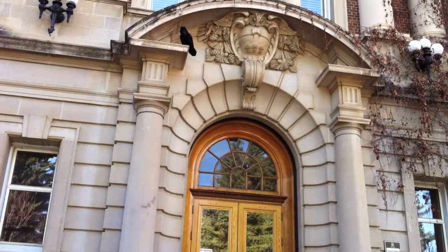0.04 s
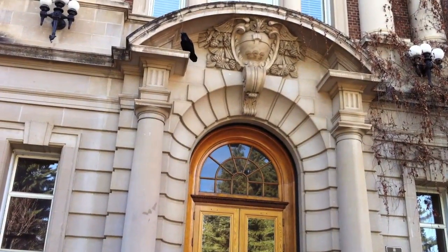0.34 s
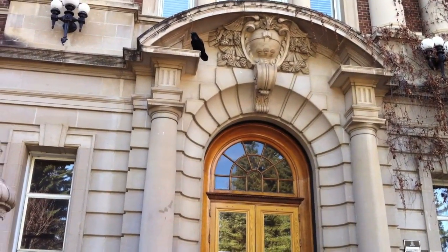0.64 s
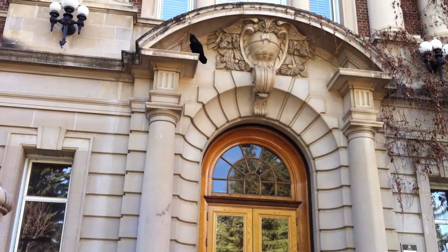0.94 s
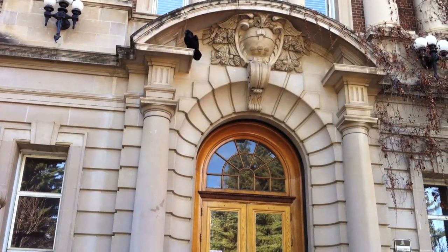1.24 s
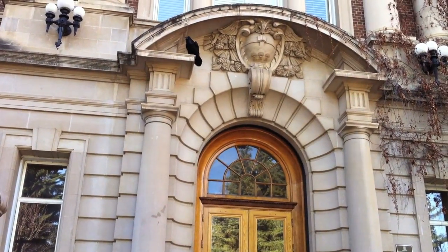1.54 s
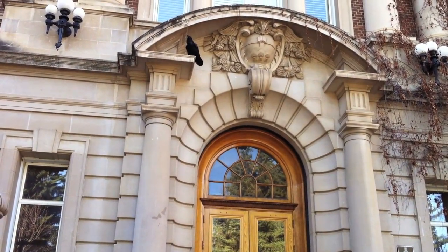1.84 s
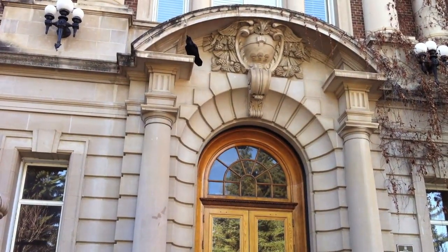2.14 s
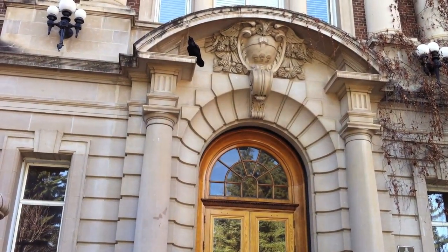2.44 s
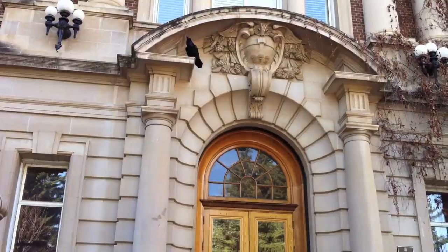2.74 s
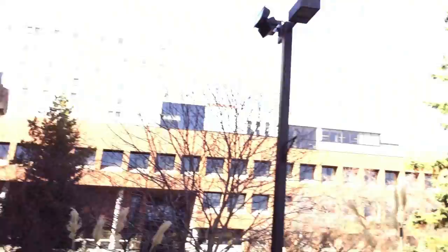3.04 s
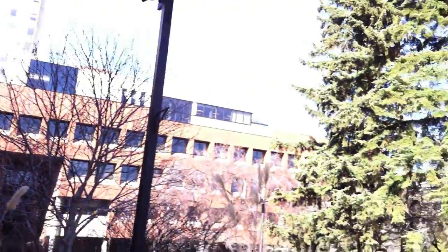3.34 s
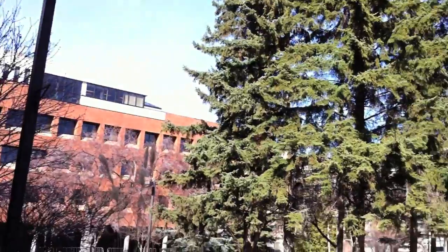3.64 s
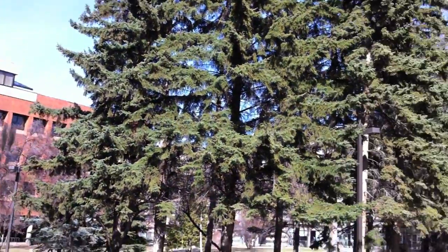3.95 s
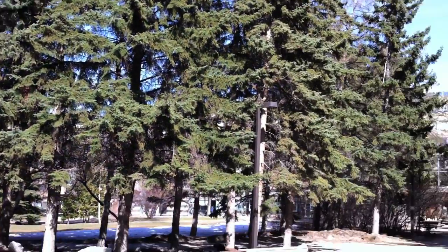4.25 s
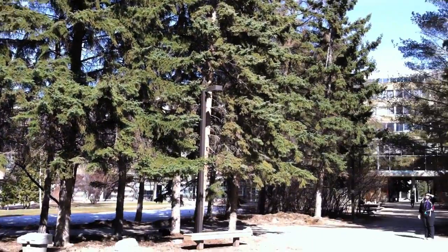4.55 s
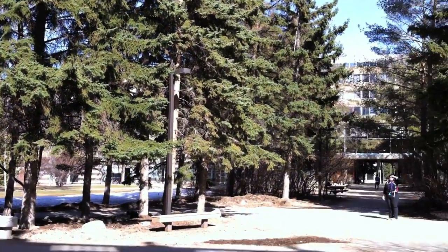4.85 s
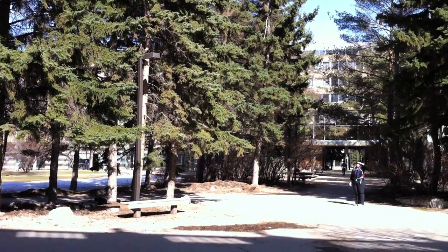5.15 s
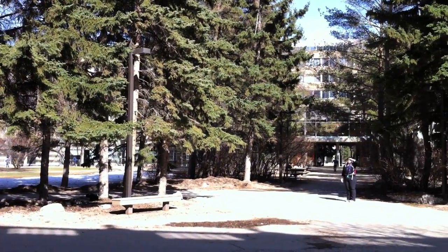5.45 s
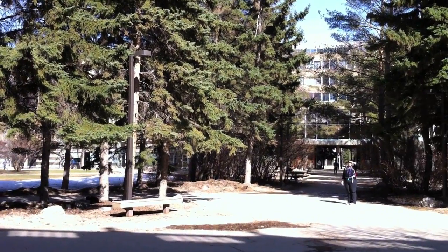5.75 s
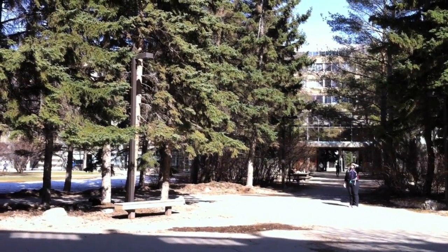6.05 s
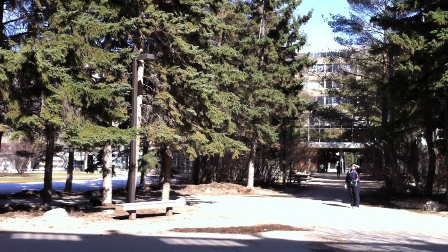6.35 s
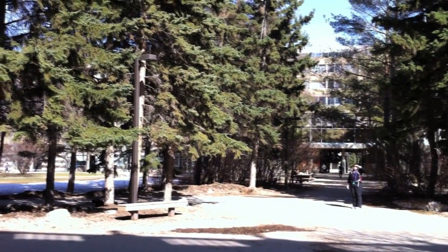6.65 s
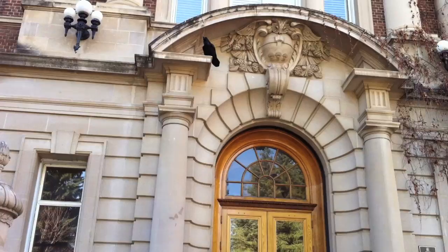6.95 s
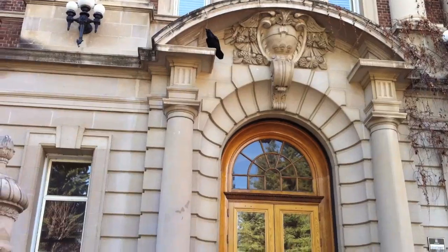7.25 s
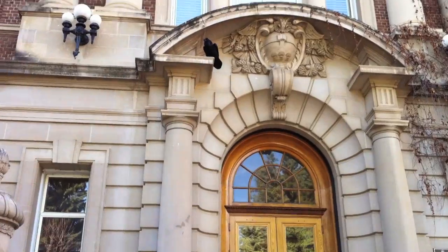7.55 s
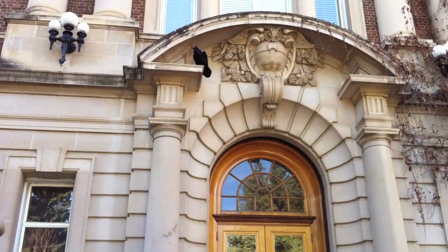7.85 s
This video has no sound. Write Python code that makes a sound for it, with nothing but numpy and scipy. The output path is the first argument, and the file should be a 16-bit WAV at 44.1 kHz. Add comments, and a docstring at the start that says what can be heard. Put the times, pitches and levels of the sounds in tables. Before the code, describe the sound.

A raven calls in an outdoor courtyard, loud against a soft, steady rumble of distant traffic, a faint ventilation hum and an airy hiss. At about 1.1 seconds, three quick hollow clicks swell into a gulp, followed by a low, throbbing coo with a slight breathy hiss and a closing gulp, about half a second in all. The same call comes again at about 3 and 5.9 seconds, each with a light echo off the walls. At 7.8 seconds the raven gives only the opening clicks and gulp. Throughout, small birds add faint buzzy chirps, falling notes and a few two-note whistles. A hand and sleeve brush the microphone with dry ticks and light rubs, mostly in the first second and again from 7 seconds, and there is one short dull bump at about 6.9 seconds.

```python
"""A raven in a courtyard

A raven on a ledge under a stone arch calls four times. Each call opens with clicks that ring its throat
and bill and swell into a gulp. The first three go on to a low throbbing coo, a hiss of air and a closing
gulp. Small birds chirp over the far rumble of town, and a hand and sleeve brush the microphone."""
import sys
import numpy as np
from scipy import signal
from scipy.fft import rfft, irfft, next_fast_len
from scipy.io import wavfile

SR = 44100
rng = np.random.default_rng(int(sys.argv[2]) if len(sys.argv) > 2 else 0)


def wrap_up_sound(samples):
    """Save the sound to the file named by the first command line argument, as 16-bit audio."""
    columns = np.atleast_2d(samples).T
    # keep every value between -1 and 1, then stretch to whole-number steps
    tamed = np.clip(columns, -1, 1)
    steps = np.round(tamed * 32767).astype(np.int16)
    wavfile.write(sys.argv[1], SR, steps)


N = 347949
T = np.arange(N) / SR

# How strong far traffic is from low to high: frequency_hz, relative_db
TRAFFIC_SPECTRUM = [(15, -82.5), (25, -37.5), (48, -39), (56, -17.5), (65, -20), (199, -0.5), (248, -4.5),
                    (388, -11), (444, -10.5), (565, -10), (605, -11), (648, -9.5), (796, -16.5),
                    (1010, -16), (1500, -24.5), (1950, -48), (3300, -120)]
# The same for the hiss of open air: frequency_hz, relative_db
AIR_SPECTRUM = [(880, -18.5), (1500, -2.5), (2450, -6.5), (2760, -4.5), (3270, -5), (4220, -6), (5730, -10),
                (6320, -13), (14200, -17), (15800, -18)]
# Tones of the ventilation hum: pitch_hz, level_db
HUM_TONES = [(81, -67), (120, -65.5), (241, -59)]
# Buzzy chirps: start_s, length_s, middle_hz, end_to_middle_ratio, relative_db, rasp (0 to 1)
CHIRPS = [(0, .053, 3900, 0.95, -44.5, 1), (.375, 0.081, 4200, 0.924, -42.5, .65),
          (0.431, 0.0634, 5100, 0.92, -47.5, .6), (1.711, 0.119, 4130, 0.937, -48.5, 0.4),
          (1.855, 0.081, 5080, 1.06, -41, 0.52), (2.181, 0.1425, 3920, 0.86, -48, 0.57),
          (2.333, 0.0836, 5400, 0.935, -49, 0.55), (2.819, 0.073, 4000, 0.88, -46, 0.98),
          (2.861, 0.039, 5000, 1, -46.5, .1), (2.911, 0.031, 3600, 1.07, -47, 0.2),
          (2.96, 0.05793, 4290, 0.95, -44, 0.65), (3.499, 0.0843, 3841, 0.95, -45, 0.79),
          (3.804, 0.09466, 4800, 0.885, -46.5, 0.77), (3.906, 0.0575, 5930, 1.04, -45.5, 0.43),
          (4.35, .095, 3950, 0.893, -45, 0.48), (4.727, 0.0555, 5150, 0.94, -45.5, 0.63),
          (5.189, .09, 4090, 0.86, -43, 0.55), (5.212, 0.08, 5155, .86, -49.5, .6),
          (5.288, 0.066, 3780, 0.92, -45, 0.84), (5.381, 0.061, 4780, 1.21, -46.5, 0.6),
          (5.463, .064, 7230, 1.06, -51.5, 0.28), (5.723, 0.082, 5100, 1.07, -45, 1),
          (5.929, 0.053, 4000, 0.81, -44.5, 0.52), (6.552, 0.058, 4320, 0.916, -43, 0.94),
          (6.602, 0.066, 5420, .96, -46.5, 0.2), (6.627, .096, 3850, 0.87, -43, 0.73),
          (6.772, 0.03507, 4307, 0.88, -42.5, 0.9), (7.22, 0.10696, 3683, 0.82, -49, 0.26),
          (7.293, 0.074, 2310, 0.928, -44.5, .06), (7.681, 0.047, 4000, 0.77, -46, 0.54)]
# Notes of a falling bird call: delay_s, length_s, first_hz, middle_hz, last_hz, relative_db, rasp
FALLING_NOTES = [(0, .094, 4400, 3050, 2085, -1.5, .7), (.026, 0.0444, 3545, 3250, 3020, -4, 1)]
# Notes of a two-note whistle, with the same columns
WHISTLE_NOTES = [(0, .05, 3741, 3987, 4378, 0.25, .05), (.04, .09, 2560, 2965, 2520, -1.5, .02)]
# When the falling calls come: start_s, relative_db
FALLING_CALLS = [(.137, -40), (.398, -43.5), (1.893, -40.5), (3.08, -39), (3.957, -41.5), (5.446, -41),
                 (6.558, -39), (6.763, -41)]
# When the two-note whistles come: start_s, relative_db
WHISTLE_CALLS = [(0.917, -48), (2.576, -45.5), (4.688, -48.5), (4.88, -64), (7.55, -47)]
# Rubs of hand and sleeve: start_s, end_s, base_level_db, grain_db
RUBS = [(0.082, 0.288, -56, 1.5), (0.671, 0.779, -48.5, 2), (1.678, 1.963, -81.5, 10),
        (2.167, 2.274, -60.5, 2.5), (2.691, 2.779, -62, 5.5), (2.833, 2.998, -61, 3.5),
        (4.137, 4.242, -72.5, 7.5), (4.667, 4.772, -64.5, 5.5), (7.112, 7.455, -49.5, 0.5),
        (7.472, 7.735, -57, 2.5), (7.687, 7.971, -50.5, 1.5)]
# How strong the rubbing is from low to high: frequency_hz, relative_db
RUB_SPECTRUM = [(820, -13), (1400, 0), (1600, -6), (2250, 0.5), (2960, -3), (3380, -0.5), (7390, -5),
                (11500, -4.5), (15800, -8)]
# Ticks of fingers and clothing: start_s, peak_db, centre_hz
TICKS = [(.099, -26.5, 11000), (.214, -37, 7484), (.297, -36.5, 4970), (0.676, -36, 11250),
         (0.696, -39.5, 10100), (2.211, -42, 11200), (2.747, -42, 1300), (3.721, -44, 10150),
         (4.14, -41, 10660), (4.755, -45, 7960), (5.199, -39, 4458)]
# Rattles that open the calls: start_s, click_gap_s, first_ring_db, first_snap_db, brightness_hz
RATTLES = [(1.0939, 0.0162, -15.5, -28.5, 3050), (3.022, 0.014, -18, -32.5, 3600),
           (5.8816, .016, -15, -28.5, 5360), (7.7745, 0.014909, -16, -27, 4780)]
# High tones at which throat and bill ring: pitch_hz, relative_db, ring_s (time to fade by 60 dB)
BILL_TONES = [(1360, -27, 0.033), (1690, -22.5, 0.053), (2526.4, -10, 0.02334), (2709.4, -7.5, 0.0167),
              (3154, -4, 0.00562), (3540, -11.5, 0.011), (4220, -7.5, 0.005), (5075, -14.5, 0.0121),
              (6060, -8.5, 0.00337)]
# Gulps: start_s, hold_s, pitch_hz, glide_hz_per_s, level_db, low_tone_relative_db, fade_db_per_s,
# pulsing (0 to 1)
GULPS = [(1.136, 0.029, 1089, 699.5, -13, -11, 560, 0.6), (1.522, 0.054, 1034, 900, -18, -8, 1701, 0.86),
         (3.056, 0.039, 1122, 500, -11.5, -17.5, 799, 0.66),
         (3.477, 0.048, 1039, 505, -16, -10.5, 1905.5, 1), (5.922, 0.0217, 1108, -600, -14, -14, 400, 0.4),
         (6.329, 0.051, 1034, 1002.5, -18, -11.5, 1000, 0.84),
         (7.815, .018, 1120, 1700, -14.5, -10.5, 380, 0.8)]
# How strong the raven's hiss is from low to high: frequency_hz, relative_db
HISS_SPECTRUM = [(880, -36.5), (1500, -38.5), (1640, -9.5), (1790, -17.5), (2340, -17), (2710, -4),
                 (3050, -6.5), (4660, -1), (5450, -10.5), (7770, -13.5), (8410, -14.5), (8750, -16.5),
                 (12200, -15.5), (13400, -18), (15800, -18)]
# Bands where air whistles in the bill: centre_hz, half_width_hz, relative_db
HISS_WHISTLES = [(2485, 200, -2), (4140, 91, 6.5), (4360, 74, -15), (4830, 19, -1), (4724, 60, 6),
                 (7940, 73, -17), (8920, 130, -5.5), (11370, 270, -7.5), (13007, 77, -1.5)]
# Coos: start_s, length_s, lowest_hz, level_db, swell_db, extra_start_roughness (0 to 1)
COOS = [(1.204, 0.312, 554.2, -19.5, 7.5, 0.68), (3.137, .33, 548.4, -21.5, 7, 0.7),
        (5.99, 0.32831, 542, -21.5, 3.5, 0.24)]
# Distant low swells: start_s, end_s, first_hz, last_hz, level_db
DRONES = [(2.035, 2.247, 371.3, 345.9, -45.5), (2.201, 2.454, 326.4, 295.9, -49.5),
          (3.521, 3.568, 150, 141, -41.5), (3.778, 3.935, 256.2, 257, -46),
          (7.185, 7.321, 259.4, 258, -43.5)]
# Echoes off the courtyard walls: delay_s, relative_db
WALL_ECHOES = [(.043, -15.5), (.068, -22.5), (.2, -56), (.45, -34.5)]


def from_db(db):
    """Turn decibels into a number to multiply a sound by."""
    return 10 ** (np.asarray(db) / 20)


def unit_level(x):
    """Scale a signal so that its average strength (rms) is 1."""
    return x / np.sqrt(np.mean(x ** 2) + 1e-20)


def add(track, start_s, sound):
    """Mix a sound into a track at the given time."""
    at = max(0, round(start_s * SR))
    track[at:at + len(sound)] += sound[:max(0, N - at)]


def seconds(length):
    """The time of each sample in a short sound."""
    return np.arange(max(8, int(length * SR))) / SR


def span(start_s, count):
    """The places in the track that a short sound covers."""
    return np.clip(int(start_s * SR) + np.arange(count), 0, N - 1)


def phase_of(hz):
    """The running angle of a wave whose pitch may change."""
    return 2 * np.pi * np.cumsum(hz) / SR


def keep_band(x, hz, kind, order=2):
    """Keep the lows, the highs or a band between."""
    return signal.sosfilt(signal.butter(order, hz, kind, fs=SR, output="sos"), x)


def flutter(hz):
    """Random wavering up to about this rate, with a typical size of 1."""
    return unit_level(keep_band(rng.standard_normal(N), hz, "low"))


def noise(spectrum):
    """Noise of strength 1, shaped by a spectrum table."""
    hz, db = np.transpose(spectrum)
    size = next_fast_len(N)
    log_hz = np.log(np.maximum(np.arange(size // 2 + 1) * SR / size, 1))
    gain = from_db(np.interp(log_hz, np.log(hz), db, left=-120, right=-120))
    return unit_level(irfft(rfft(rng.standard_normal(size)) * gain, size)[:N])


def swell(start, end, power):
    """A rise from 0 to 1 and back; a small power flattens the top."""
    return np.sin(np.pi * np.linspace(0, 1, len(seconds(end - start)))).clip(0) ** power


def ring(t, hz, ring_s):
    """A tone that fades by 60 dB in ring_s."""
    return np.sin(2 * np.pi * hz * t) * from_db(-60 * t / ring_s)


def echo(x, delay_s, db):
    """A sound together with one reflection of it."""
    return x + from_db(db) * np.interp(T - delay_s, T, x, left=0)


def town(traffic_db=-46, waver_db=1.1053, air_db=-56):
    """Far traffic rumbles, ventilation hums and the open air hisses evenly."""
    traffic = from_db(traffic_db + waver_db * flutter(4)) * noise(TRAFFIC_SPECTRUM)
    hum = sum(np.sqrt(2) * from_db(db) * np.sin(phase_of(hz + 2 * flutter(8))) for hz, db in HUM_TONES)
    return traffic + hum + from_db(air_db) * noise(AIR_SPECTRUM)


def bird_notes(start_ratio=0.93):
    """List every small bird's note; a chirp starts a little low, which bends its glide."""
    notes = [(start, length, start_ratio * hz / glide, hz, glide * hz, db, rasp)
             for start, length, hz, glide, db, rasp in CHIRPS]
    for phrase, calls in ((FALLING_NOTES, FALLING_CALLS), (WHISTLE_NOTES, WHISTLE_CALLS)):
        for start, db in calls:
            for delay, length, first, middle, last, note_db, rasp in phrase:
                notes.append((start + delay, length, first, middle, last, db + note_db, rasp))
    return notes


def small_birds(clear_hz=2500, harsh_hz=4200, throat_hz=3200, throat_db=4, fade_db=7):
    """Whistles glide through three pitches, grow where the throat rings and buzz more when high."""
    out, jitter = np.zeros(N), flutter(800)
    flicker = from_db(2.5 * flutter(96))
    wander = 1 + 0.01203 * flutter(38.5)
    for start, length, first, middle, last, db, rasp in bird_notes():
        shape = swell(start, start + length, power=0.31)
        here, progress = span(start, len(shape)), np.linspace(0, 1, len(shape))
        hz = np.polyval(np.polyfit([0, .5, 1], [first, middle, last], 2), progress) * wander[here]
        boost_db = throat_db * np.exp(-((hz - throat_hz) / 350) ** 2)
        level = from_db(db + boost_db - fade_db * progress ** 3)
        buzz = 0.1234 * rasp * np.interp(hz, [clear_hz, harsh_hz], [.1, 1]) * jitter[here]
        main = np.sin(phase_of(hz * (1 + buzz)))
        # The other side of the bird's voice box adds a higher tone.
        second = from_db(-7) * rasp * (1 - progress) * np.sin(phase_of(hz * 1.4 * (1 - buzz)))
        add(out, start, level * shape * flicker[here] * (main + second))
    return echo(out, delay_s=.012, db=-12)   # off the nearest house front


def handling(tick_ring_s=0.024, bump_at_s=6.888, bump_db=-20, bump_hz=190, bump_ring_s=0.0068):
    """A hand and sleeve make grainy rubs, dry ticks and one dull bump on the casing."""
    out, cloth, grain = np.zeros(N), noise(RUB_SPECTRUM), flutter(189.9)
    for start, end, db, grain_db in RUBS:
        shape = swell(start, end, power=0.535)
        here = span(start, len(shape))
        add(out, start, from_db(db + grain_db * (grain[here] + 1)) * shape * cloth[here])
    for start, db, hz in TICKS:
        burst = keep_band(rng.standard_normal(2048), [hz / 1.2592, hz * 1.33], "band")
        tick = burst * from_db(-60 * T[:len(burst)] / tick_ring_s)
        add(out, start, from_db(db) * tick / np.abs(tick).max())
    t = seconds(.04)
    knock = np.cos(2 * np.pi * bump_hz * t) * from_db(-60 * t / bump_ring_s)
    dull_knock = keep_band(knock, 2730, "low", order=4)
    add(out, bump_at_s, from_db(bump_db) * keep_band(dull_knock, 136.6, "high"))
    return out


def raven_rattle(throat_hz=1075, low_hz=530, ring_s=0.031, ring_step_db=6, snap_step_db=3):
    """Three ever louder clicks: each is a brief scrape that rings the throat and bill."""
    out, t = np.zeros(N), seconds(0.069)
    throat = ring(t, throat_hz, ring_s) + from_db(-15) * ring(t, low_hz, ring_s)
    throat *= 1 - np.exp(-t / 0.0037)   # soft start
    bill = sum((-1) ** k * from_db(db) * ring(t, hz, fade_s)
               for k, (hz, db, fade_s) in enumerate(BILL_TONES))
    for start, gap, ring_db, snap_db, bright_hz in RATTLES:
        for k in range(3):
            grit = rng.standard_normal(len(t)) * np.exp(-t / 0.0047)
            scrape = from_db(-17) * signal.fftconvolve(grit, bill)[:len(t)]
            snap = keep_band(0.16 * bill + scrape, bright_hz, "low", order=3)
            click = from_db(ring_db + k * ring_step_db) * throat
            click += from_db(snap_db + k * snap_step_db) * snap
            add(out, start + k * gap, click)
            add(out, start + k * gap + 0.0061, from_db(1.34) * click)   # the arch throws it back
    return out


def raven_gulps(low_hz=535, pulse_hz=65.95, rise_s=0.0038, low_fade_share=0.48, air_db=-33):
    """Soft pulses of air ring two throat tones; the lower, about an octave down, dies more slowly."""
    out, t = np.zeros(N), seconds(.14)
    upper_waver, lower_waver = 1 + 0.02 * flutter(96), 1 + 0.032 * flutter(90)
    air = from_db(air_db) * unit_level(keep_band(rng.standard_normal(N), [1200, 2900], "band"))
    dips = 1 - np.abs(np.sin(np.pi * pulse_hz * t))
    for start, hold, hz, glide, db, low_db, fade_rate, pulsing in GULPS:
        here = span(start, len(t))
        drive = from_db(db) * (1 - np.exp(-t / rise_s)) * (1 - pulsing * dips)
        fade_db = -fade_rate * np.maximum(t - hold, 0)
        upper = phase_of((hz + glide * t) * upper_waver[here])
        lower = phase_of(low_hz * lower_waver[here])
        overtones = from_db(-36) * np.sin(upper + lower) + from_db(-38) * np.sin(2 * upper)
        high_tone = from_db(fade_db) * (np.sin(upper) + overtones + air[here])
        low_tone = from_db(low_db + low_fade_share * fade_db) * np.sin(lower)
        add(out, start, drive * (high_tone + low_tone))
    return out


def raven_hiss(level_db=-46, lead_s=0.021, linger_s=0.028, rise_s=.01, fade_s=0.0556):
    """Grainy air escapes from just before each coo to just after, whistling faintly in the bill."""
    flow, white = np.zeros(N), rng.standard_normal(N)
    for start, length, *_ in COOS:
        t = seconds(lead_s + length + linger_s)
        shape = (1 - np.exp(-t / rise_s)) * np.clip(t[::-1] / fade_s, 0, 1)
        add(flow, start - lead_s, from_db(level_db) * shape)
    whistle = sum(from_db(db) * keep_band(white, [hz - half_width, hz + half_width], "band", order=1)
                  for hz, half_width, db in HISS_WHISTLES)
    grainy_air = noise(HISS_SPECTRUM) * from_db(2.5 * flutter(600))
    breath = (grainy_air + from_db(-3) * unit_level(whistle)) * from_db(1.5 * flutter(53))
    with_ledge = echo(breath, delay_s=0.0011246, db=-8)
    with_arch = echo(with_ledge, delay_s=0.0062, db=-4)
    return flow * unit_level(with_arch)


def raven_coos(throb_hz=32.9, depth=0.87, lower_share=0.81, rasp_hz=585, bend_hz=7.97,
               lowest_at_s=0.1164, loudest_at_s=.21, settle_s=0.087, fade_s=0.033):
    """A flutter in the voice box makes a low tone throb deeply; its pitch sags, then climbs."""
    out, rasp_phase = np.zeros(N), 2 * np.pi * rasp_hz * T
    rasp = flutter(45) * np.sin(rasp_phase) + flutter(45) * np.cos(rasp_phase)
    waver_hz, stumble = 4 * flutter(27), 0.2 * flutter(28)
    for start, length, hz, db, swell_db, start_roughness in COOS:
        t = seconds(length)
        here = span(start, len(t))
        tone = phase_of(hz + bend_hz * (t / lowest_at_s - 1) ** 2 + waver_hz[here])
        throb = np.pi + 2 * np.pi * throb_hz * t + stumble[here]
        roughness = .07 + start_roughness * np.exp(-(t / settle_s) ** 4)
        # Tones one throb rate apart take turns helping and cancelling each other.
        side_tones = lower_share * np.sin(tone - throb) + (1 - lower_share) * np.sin(tone + throb)
        voice = np.sin(tone) + depth * side_tones - from_db(-22) * np.sin(tone - 2 * throb)
        voice += from_db(-32) * np.sin(2 * tone - throb) * (1 + np.cos(throb))   # faint octave
        voice += from_db(-6) * roughness * rasp[here] * 2 * np.abs(np.cos(throb / 2))
        level = np.sqrt(2) * from_db(db - swell_db * (t / loudest_at_s - 1) ** 2)
        edges = np.clip((length - t) / fade_s, 0, 1) * swell(start, start + length, power=0.04326)
        add(out, start, level * edges * voice)
    return out


def drones(waver_hz=25):
    """Narrow, hollow swells rise out of the far rumble."""
    out, cos_waver, sin_waver = np.zeros(N), flutter(waver_hz), flutter(waver_hz)
    for start, end, first_hz, last_hz, db in DRONES:
        shape = swell(start, end, power=0.3775)
        here = span(start, len(shape))
        phase = phase_of(np.linspace(first_hz, last_hz, len(shape)))
        hollow = cos_waver[here] * np.cos(phase) + sin_waver[here] * np.sin(phase)
        add(out, start, from_db(db) * shape * hollow)
    return out


def courtyard(x, tail_db, ring_s, dull_hz):
    """Add a few wall echoes and a soft tail scattered by house fronts and trees."""
    t = T[:2 * SR]
    tail = keep_band(rng.standard_normal(len(t)), dull_hz, "low", order=1)
    tail *= from_db(-60 * t / ring_s) * (1 - np.exp(-t / 0.0088))
    tail = keep_band(tail, 750, "high", order=1)   # the ground soaks up the lows
    echoes = from_db(tail_db) * tail / np.sqrt(np.sum(tail ** 2))
    for delay, db in WALL_ECHOES:
        echoes[int(delay * SR)] += from_db(db)
    return x + signal.fftconvolve(x, echoes)[:N]


def scene():
    """Mix everything into one channel; the raven and small birds echo in the courtyard."""
    calls = raven_rattle() + raven_gulps() + raven_coos() + raven_hiss()
    raven = courtyard(calls, tail_db=-26, ring_s=1.699, dull_hz=3000)
    birds = from_db(-2.5) * courtyard(small_birds(), tail_db=-7, ring_s=0.39, dull_hz=6069)
    return (raven + birds + handling() + drones() + town())[None]


def record(dry, cutoff_hz=15850):
    """Cut the very highest treble steeply."""
    return signal.sosfilt(signal.ellip(12, .1, 80, cutoff_hz, fs=SR, output="sos"), dry)


dry = scene()
out = record(dry)
wrap_up_sound(out)
```